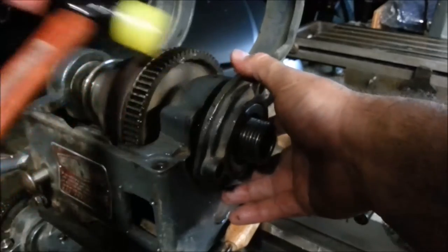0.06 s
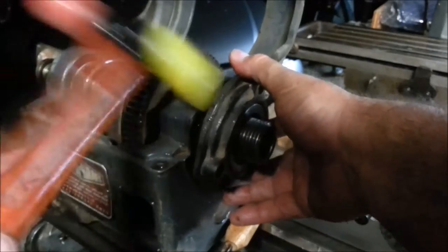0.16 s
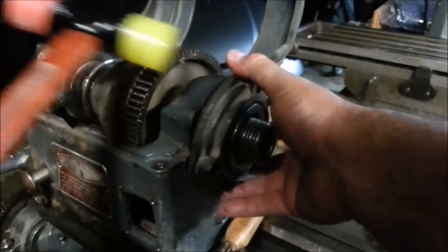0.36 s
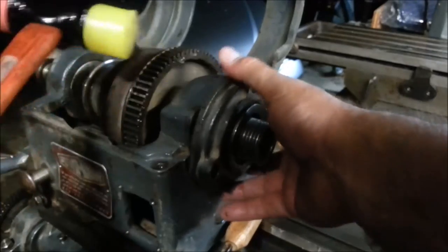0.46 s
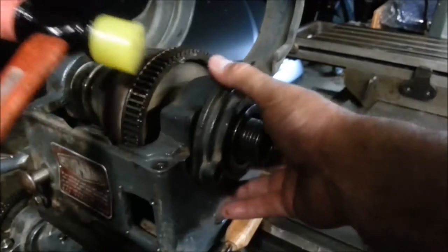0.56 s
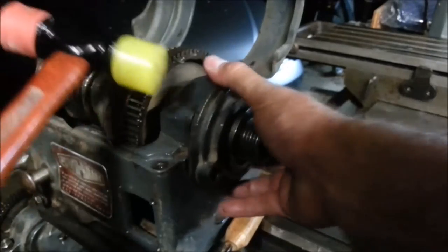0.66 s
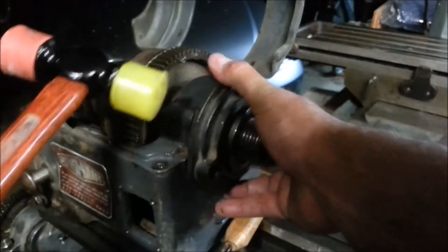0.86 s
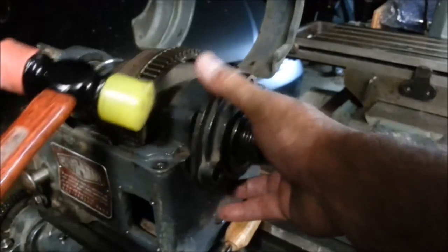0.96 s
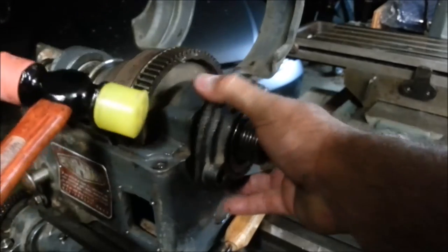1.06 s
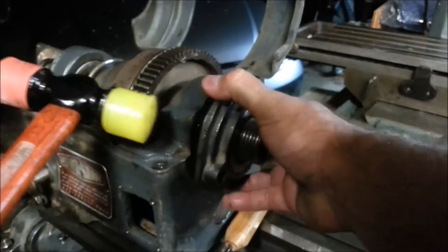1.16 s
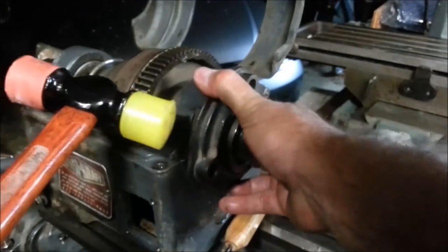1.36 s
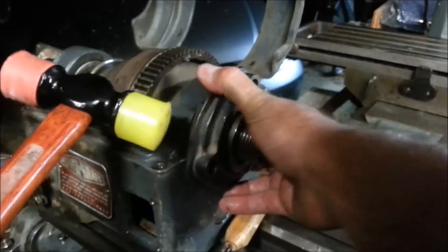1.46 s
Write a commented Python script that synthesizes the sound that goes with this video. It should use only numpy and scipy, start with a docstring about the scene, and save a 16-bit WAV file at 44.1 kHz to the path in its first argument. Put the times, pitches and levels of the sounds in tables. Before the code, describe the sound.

Close, distorted mallet blow on a machine spindle, sharp knock over a hollow cast-iron boom and short high ring, then soft taps and little sliding hums; small room echo, recorder hiss, rapid faint buzz-like ticking on the left.

```python
"""In a small workshop, a soft-faced mallet strikes a steel spindle in its cast housing once hard, then nudges it;
an earlier blow is dying away. Ringing modes make the steel, the casting and the knock; noise puffs the clatter.
Loose parts jingle, the housing hums in sine swells as the shaft slides, and decaying noise is the room's echo.
The recorder overloads and hisses, and its left channel ticks thirty times a second."""
import sys
import numpy as np
from scipy import signal
from scipy.io import wavfile

SR = 44100
rng = np.random.default_rng(int(sys.argv[2]) if len(sys.argv) > 2 else 0)


def attenuation_scalar(level_db):
    """Turn a level in dB into a linear amplitude multiplier (20 dB per decade)."""
    decades = np.asarray(level_db, float) / 20
    return 10 ** decades


def bounce(signal):
    """Save signal as a 16-bit WAV file at the path given by the first command-line argument."""
    frames = np.transpose(np.atleast_2d(signal))
    limited = np.clip(frames, -1, 1)
    pcm = np.round(limited * 32767).astype(np.int16)
    wavfile.write(sys.argv[1], SR, pcm)


N = 66150
RUN_IN = 5000   # samples computed ahead of time zero, so that earlier sound is still dying away


def timeline():
    """Seconds, negative during the run-in."""
    return (np.arange(N + RUN_IN) - RUN_IN) / SR


def filtered(x, order, hz, kind="low"):
    """Butterworth filter."""
    return signal.sosfilt(signal.butter(order, hz, kind, fs=SR, output="sos"), x)


def low_stop(x, order, stop_db, stop_hz):
    """Steep low-pass: everything above stop_hz is at least stop_db down."""
    return signal.sosfilt(signal.cheby2(order, stop_db, stop_hz, fs=SR, output="sos"), x)


def at_hz(points, hz):
    """Reads a (Hz, value) table on a log axis."""
    table_hz, values = np.transpose(points)
    return np.interp(np.log(hz), np.log(table_hz), values)


def ring(s, gains, hz, t60):
    """A two-pole resonator: clicks at times s set a sine ringing that falls 60 dB in t60 seconds."""
    clicks = np.full(N + RUN_IN, 1e-18)   # inaudible floor
    np.add.at(clicks, np.round(np.asarray(s) * SR).astype(int) + RUN_IN, gains)
    r, w = attenuation_scalar(-60 / (t60 * SR)), 2 * np.pi * hz / SR
    return signal.lfilter([0, np.sin(w)], [1, -2 * r * np.cos(w), r * r], clicks)


def struck(s, db, modes, spread_db, soft_hz, sense=-1):
    """Every contact strikes every mode with a random strength; each next mode is multiplied by sense once more."""
    chance = rng.standard_normal((len(s), len(modes)))
    strength_db = db + spread_db * chance   # contacts x modes
    out = 0
    for k, (hz, level, t60) in enumerate(modes):
        out = out + sense ** k * ring(s, attenuation_scalar(strength_db[:, k] + level), hz, t60)
    return filtered(out, 2, min(soft_hz, .45 * SR))


def bursts(s, db, decay_s, low_hz, high_hz):
    """Puffs of band noise start abruptly and die exponentially."""
    t = timeline()
    shape = sum(attenuation_scalar(d) * (t >= a) * np.exp(-np.abs(t - a) / decay_s) for a, d in zip(s, db))
    return filtered(shape * rng.standard_normal(len(t)), 2, [low_hz, high_hz], "band")


def bands(white, shape):
    """Half-octave bands of noise, neighbours unrelated; shape(hz, band) colours each one."""
    edges = 25 * 2 ** np.arange(0, 9.6, .5)
    out = 0
    for k, (low, high) in enumerate(zip(edges, edges[1:])):
        band = filtered(white[k % 2], 2, [low, high], "band")
        out = out + shape(np.sqrt(low * high), band)
    return out


# Contacts of mallet, shaft and casting. Each row: time in seconds, housing level in relative dB,
# favoured housing pitch in Hz, knock level in relative dB, spindle level in dB.
CONTACTS = [(-.064, -14, 343, -11.5, -8), (-.004, -14, 605, -33, -31), (0.203, -34, 488, -44, -49),
            (.2253, -19, 400, -24, -34), (0.229, -21.5, 420, -7, 3.5), (.247, -18, 364, -40, -37),
            (.256, -20, 680, -35, -44), (.264, -19.5, 440, -29, -44), (.628, -55, 450, -51, -47),
            (.633, -35, 440, -58, -55), (0.6496, -38.5, 390, -60, -63), (.680, -37, 450, -29, -28),
            (.692, -32, 447, -50, -43), (0.917, -34, 430, -41, -63.5), (1.095, -31.5, 600, -39.5, -39.5),
            (1.128, -30, 397, -49, -51.5), (1.149, -25.5, 380, -35, -48), (1.159, -20.5, 350, -39.5, -52),
            (1.170, -39, 354, -55, -71), (1.183, -37, 425, -60, -70), (1.198, -41, 360, -65, -73),
            (1.215, -43, 353, -70, -67), (1.232, -46, 354, -68, -69), (1.327, -39, 454, -39, -48.5),
            (1.346, -31, 462, -24.5, -38), (1.350, -32.5, 655, -32, -53)]
# Ringing modes of the steel shaft. Each row: frequency in Hz, level in dB, t60 in seconds.
SPINDLE_MODES = [(1572, -34, 0.089), (2028, -35, 0.088), (2125, -31, .08), (2450, -14, .06),
                 (2518, -1, .066), (2555, -9, .14), (2524, -21, .22), (2898, -20, .17), (3033, -29.5, 0.15),
                 (3150, -24.5, 0.12), (3308, -30.5, 0.18), (3765, -24.5, .06), (4210, -33.5, .1),
                 (5879, -37, 0.12)]


def spindle():
    """The steel shaft rings in its own modes at every contact."""
    s, db = np.transpose(CONTACTS)[[0, 4]]
    return struck(s, db[:, None], SPINDLE_MODES, spread_db=2.5, soft_hz=7300)


# Modes of the knock of the plastic mallet face. Each row: frequency in Hz, level in dB, t60 in seconds.
FACE_MODES = [(815, -7.5, 0.03), (1050, -7.5, 0.015), (1392, -2.5, 0.021), (1678, -3.5, 0.02),
              (1999, -5, 0.027), (2370, -6, 0.02), (2697, -5, 0.029)]


def face_knock():
    """The plastic face knocks: short, low-passed modes at every contact."""
    s, knock_db = np.transpose(CONTACTS)[[0, 3]]
    return struck(s, knock_db[:, None] - 2, FACE_MODES, spread_db=3.5, soft_hz=2700)


# Steel clattering on steel. Each row: time in seconds, level in dB before the band filter, centre in Hz.
CLATTERS = [(-.064, -4, 4300), (.2252, -9, 4500), (.2291, 6, 3800), (.236, -3, 4800), (0.985, -49, 3600),
            (1.097, -40, 3000), (1.147, -35, 3600), (1.154, -32, 2560), (1.327, -35, 4300),
            (1.347, -31, 2850)]


def steel_clatter():
    """Steel on steel has too many short modes to tell apart, so each clatter is a puff of band noise."""
    decay_s, half_width_octaves = 0.0045, 0.56
    spread = 2 ** half_width_octaves
    return sum(bursts([s], [db], decay_s, hz / spread, hz * spread) for s, db, hz in CLATTERS)


# Booming modes of the cast housing. Each row: frequency in Hz, level in dB, t60 in seconds.
HOUSING_MODES = [(312.3, -9, 0.059), (334.7, -5, 0.13), (357.8, -1, 0.08), (391, -3.5, 0.11),
                 (447.4, 0.85, .11), (527, -6.5, 0.049), (600, -0.5, .12), (671, -7, 0.12),
                 (752, -4, 0.1005), (785, -4.5, 0.064)]


def housing():
    """The casting booms most on the modes nearest the pitch favoured by the struck spot."""
    s, db, favoured_hz = np.transpose(CONTACTS)[:3]
    favour_octaves = .3   # distance at which a mode is 3.29 dB weaker
    mode_hz = np.array(HOUSING_MODES)[:, 0]
    away = np.log2(mode_hz / favoured_hz[:, None]) / favour_octaves
    mode_db = db[:, None] - 3.29 * away ** 2 - 6.0
    return struck(s, mode_db, HOUSING_MODES, spread_db=4, soft_hz=1100, sense=0.97)


# Hums under the sliding shaft. Each row: start in seconds, length in seconds, peak level in dB, pitch in Hz.
SLIDES = [(1.094, 0.037, -30, 453), (1.292, 0.036, -36, 443.6), (1.329, .022, -30.5, 452.5)]


def slide_hum():
    """While the shaft slides the housing hums: a sine swells and fades in half a sine arch."""
    t, out = timeline(), 0
    for start, length, db, pitch in SLIDES:
        swell = np.sin(np.pi * np.clip((t - start) / length, 0, 1))
        out = out + attenuation_scalar(db) * swell * np.sin(2 * np.pi * pitch * (t - start))
    return out


# Jingles of the loose part. Each row: time in seconds, level in relative dB.
JINGLES = [(0.202, -55.5), (0.227, -32), (0.229, -29), (.245, -50), (.628, -46.5), (.636, -53.5),
           (1.095, -39), (1.108, -47.5), (1.118, -51.5), (1.124, -54), (1.150, -50), (1.328, -66)]
# Modes of the loose part. Each row: frequency in Hz, level in dB, t60 in seconds.
LOOSE_MODES = [(6900, -11, 0.032), (7440, -4, .04), (8020, -3.5, 0.014), (10040, -3, 0.07),
               (10900, -9.5, 0.034), (12100, -10.5, .05), (13300, -12.5, 0.029)]


def loose_part():
    """The loose part ticks as a noise puff and jingles in high modes."""
    s, db = np.transpose(JINGLES)
    tick = bursts(s, db + 0.5, decay_s=0.0021, low_hz=3000, high_hz=13500)
    return tick + struck(s, db[:, None], LOOSE_MODES, spread_db=2.5, soft_hz=16000)


# How long the workshop echoes. Each row: frequency in Hz, t60 in seconds.
ROOM_T60 = [(150, 0.5), (500, 0.31), (1500, 0.1839), (2500, 0.35), (4000, 0.3468), (6000, 0.16),
            (9000, 0.3), (13000, 0.04)]
# Tone of the workshop echo. Each row: frequency in Hz, level in dB.
ROOM_COLOUR = [(150, -5), (500, -4.5), (1500, -5), (2500, -6.5), (4000, -12), (6000, -18.5), (9000, -18.5),
               (13000, -18)]


def workshop(x):
    """Dense echo of decaying noise, dying band by band, unrelated in the two channels."""
    t = np.arange(SR // 2) / SR
    delay_s = 0.0022

    def dying(hz, band):
        t60 = at_hz(ROOM_T60, hz)
        even_energy = np.sqrt(2 * np.log(1000) / (t60 * SR))   # long and short decays carry equal energy
        return band * attenuation_scalar(at_hz(ROOM_COLOUR, hz) - 60 * t / t60) * even_energy

    echo = bands(rng.standard_normal((2, 2, len(t))), dying)
    echo = echo * np.clip(t / delay_s - 1, 0, 1)   # silent for the delay, then fades in over the same time
    return signal.fftconvolve(x[None], echo, axes=1)[:, :len(x)]


# Tone of the hiss. Each row: frequency in Hz, density in relative dB per Hz.
HISS_COLOUR = [(18, -35.5), (30, -15.5), (197, -2), (606, -7.5), (874, -14), (1110, -8), (1640, -21.5),
               (1770, -18.5), (3490, -18), (5890, -25), (14000, -25.5), (15500, -42)]
# Stereo width of the hiss. Each row: frequency in Hz, left-right likeness from -1 to 1.
HISS_LIKENESS = [(60, -.2), (300, 0.35), (640, 0.86), (1500, .05), (15000, .01)]


def hiss():
    """Steady background of room and circuits: coloured noise, partly shared by the channels."""
    def colour(hz, band):
        alike = np.clip(at_hz(HISS_LIKENESS, hz), -1, 1)
        shared = np.sqrt(1 + alike) * band[0]
        opposed = np.sqrt(1 - alike) * band[1] * [[1], [-1]]
        return attenuation_scalar(at_hz(HISS_COLOUR, min(hz, 14000))) * (shared + opposed)

    out = bands(rng.standard_normal((2, 2, N + RUN_IN)), colour)
    out = low_stop(out, 24, 50, 14650)[:, RUN_IN:]
    return attenuation_scalar(-56) * out / out.std()


def ticks():
    """A short square pulse at a steady rate, rounded and stripped of bass; faint and inverted on the right."""
    first_s, period_s, length_s = .01868 - .0003, .03329, 0.001405
    phase = (np.arange(N) / SR - first_s) % period_s
    pulse = 1. * (phase < length_s)
    pulse = filtered(filtered(pulse, 2, 266, "high"), 1, 1540)
    return attenuation_scalar(-34) * pulse * np.array([[1], [-0.047]])


def scene():
    """The work stands a little to one side: the left port hears it later, the shaft end latest."""
    casting, metal = housing() + slide_hum(), face_knock() + steel_clatter()
    shaft, loose = spindle(), loose_part()
    side = np.array([[.5], [-.5]])   # left louder, right softer by half the pan each
    housing_pan, metal_pan = attenuation_scalar(5 * side), attenuation_scalar(2.75 * side)   # dB between the channels
    body = casting * housing_pan + metal * metal_pan
    end = (shaft + loose) * metal_pan
    body_lag_s, end_lag_s = .00007, .00009
    left = np.roll(body[0], round(body_lag_s * SR)) + np.roll(end[0], round(end_lag_s * SR))
    near = np.array([left, body[1] + end[1]])
    # the ring beams at the recorder and reaches the walls weakly
    echo = workshop(casting + metal + loose + attenuation_scalar(-13) * shaft)
    work = filtered(near + echo, 4, 282, "high")   # the ports pass little bass
    return work[:, RUN_IN:]


def low_pass(x):
    """Removes everything above the highest recorded frequency."""
    return signal.sosfilt(signal.butter(12, 15680, fs=SR, output="sos"), x)


def record(dry):
    """The input stage clips hard and passes little bass; hiss and circuit ticks join in, the top is cut."""
    overload = .54   # clipping level, full scale = 1
    clipped = np.clip(dry, -overload, overload)
    mix = filtered(clipped, 1, 330, "high") + hiss() + ticks()
    return low_pass(low_stop(mix, 14, 60, 15900))


dry = scene()
out = record(dry)
bounce(out)
```